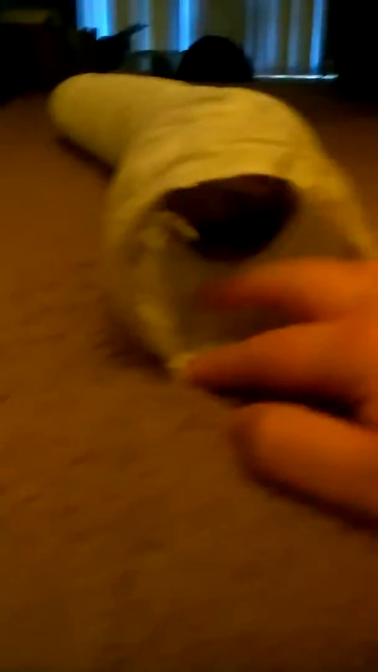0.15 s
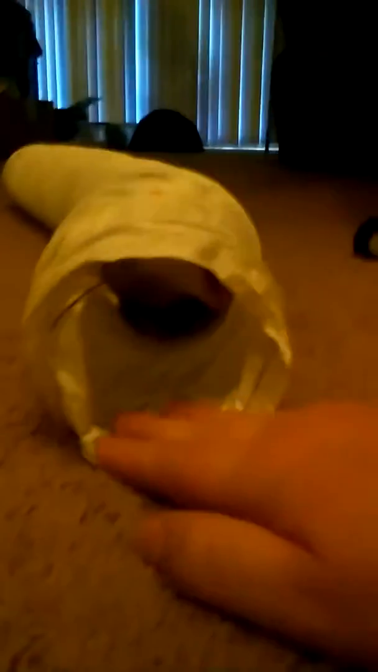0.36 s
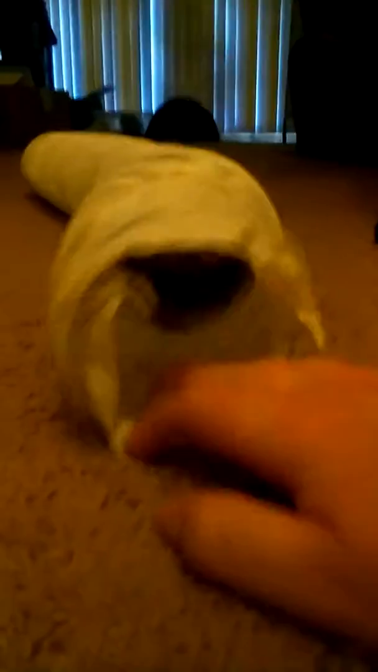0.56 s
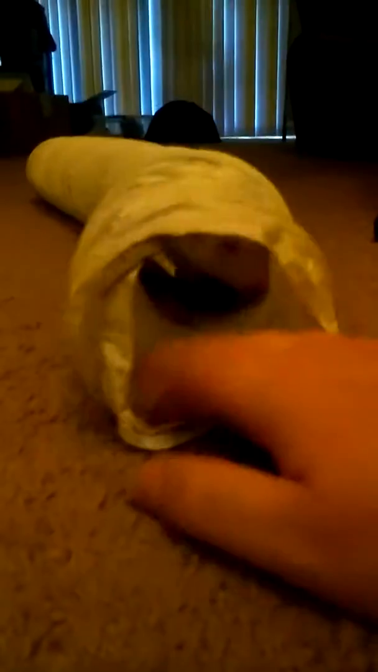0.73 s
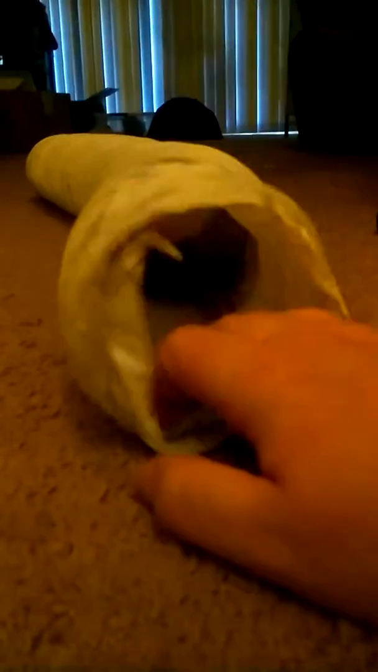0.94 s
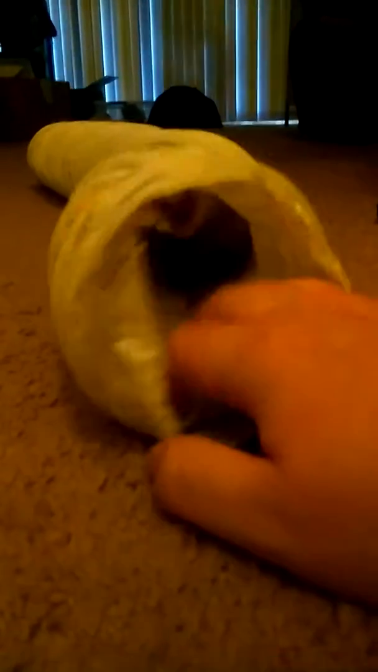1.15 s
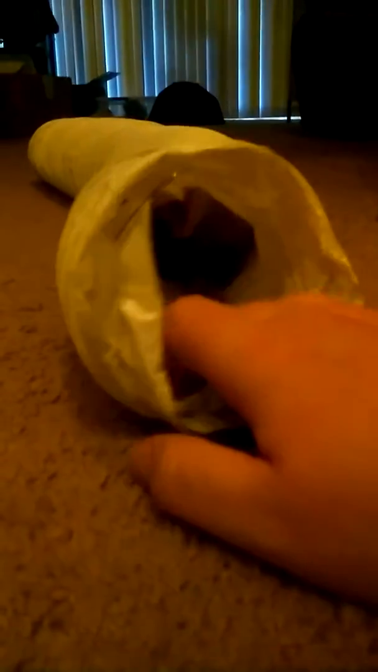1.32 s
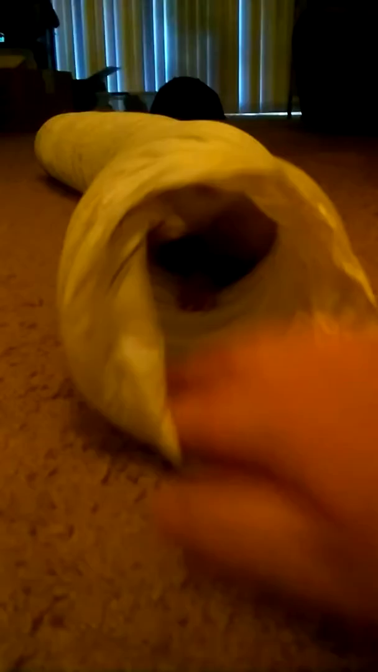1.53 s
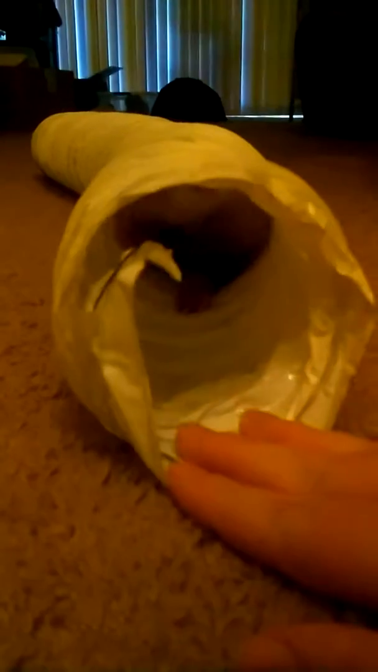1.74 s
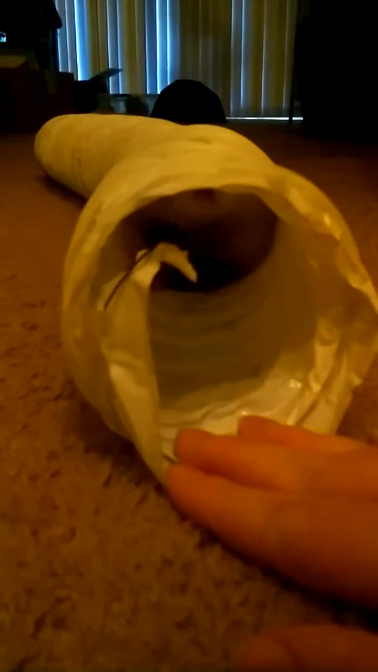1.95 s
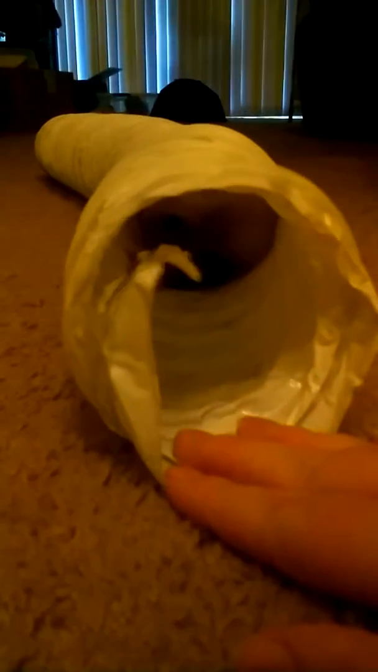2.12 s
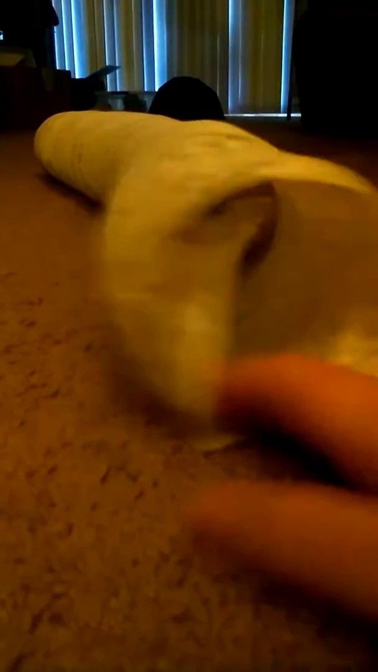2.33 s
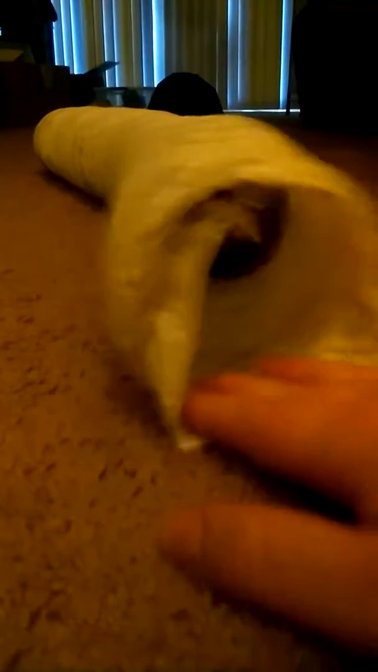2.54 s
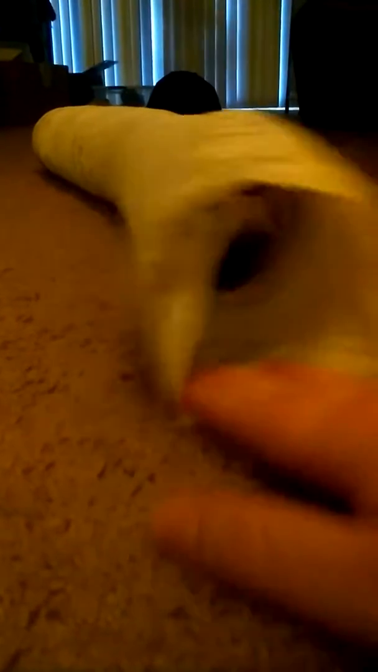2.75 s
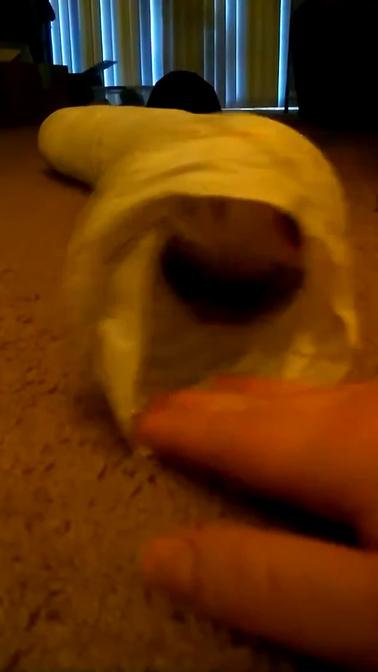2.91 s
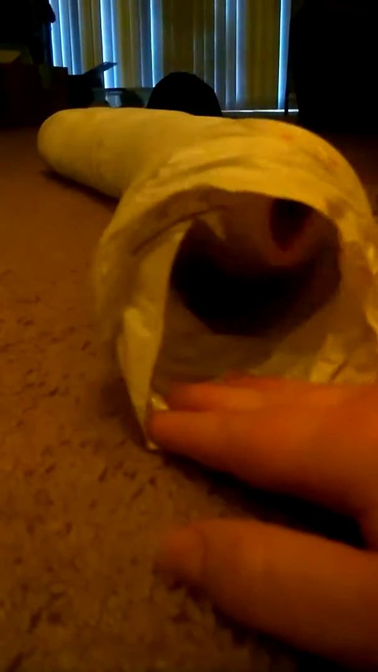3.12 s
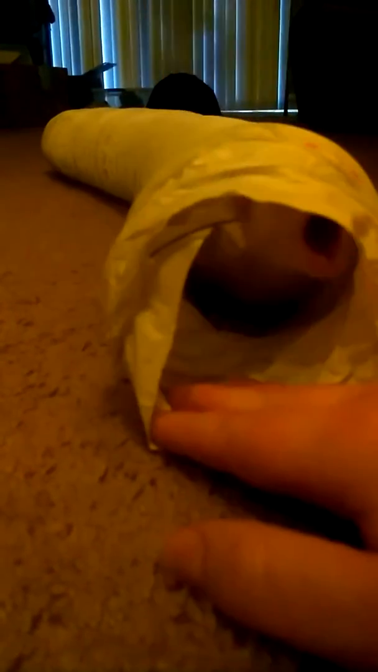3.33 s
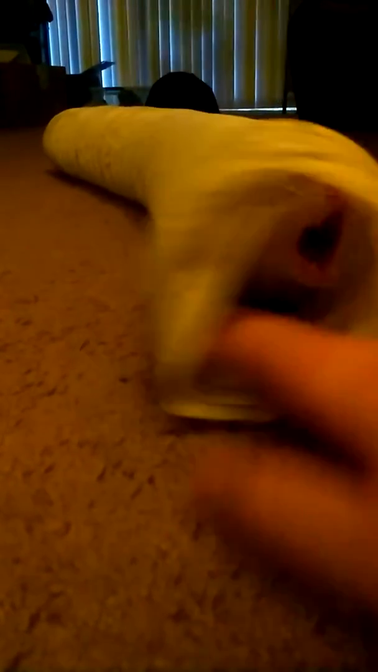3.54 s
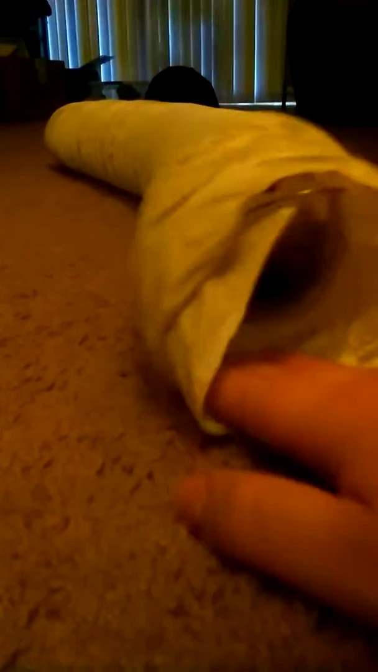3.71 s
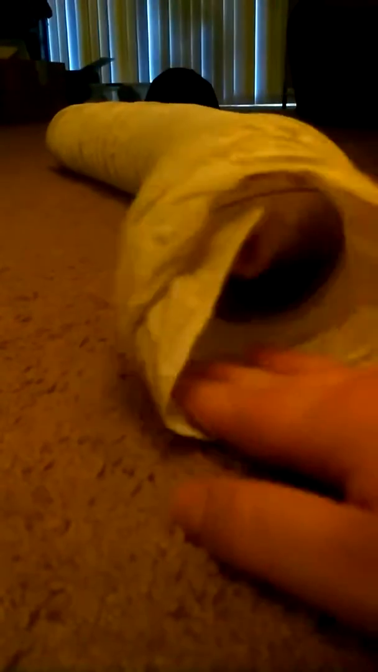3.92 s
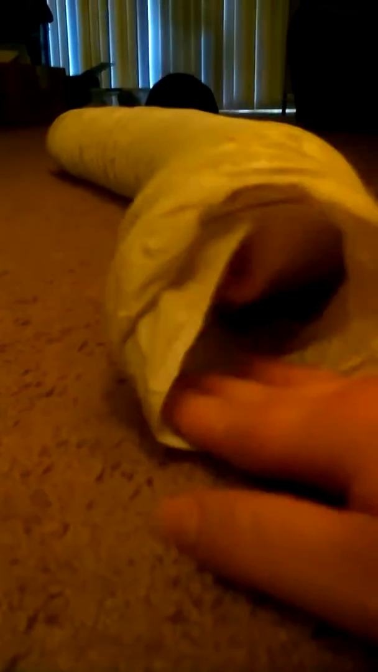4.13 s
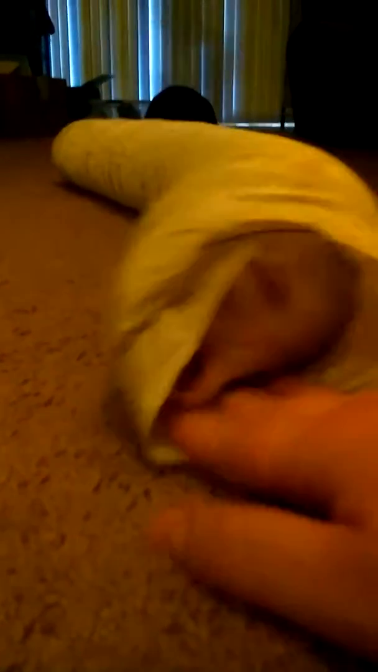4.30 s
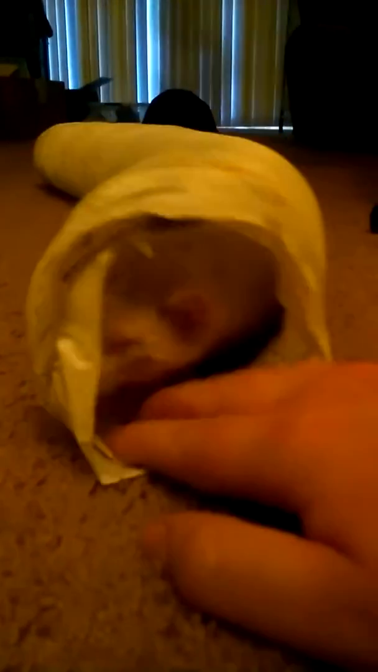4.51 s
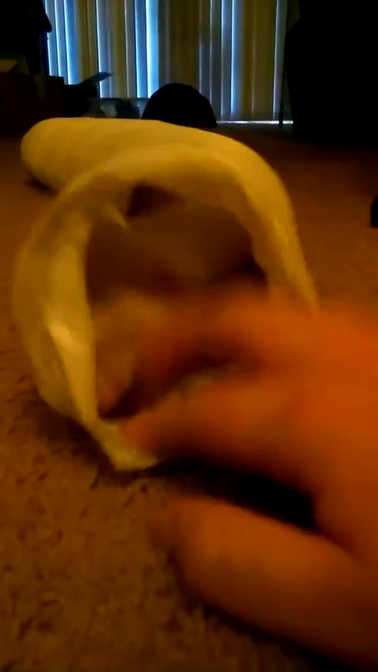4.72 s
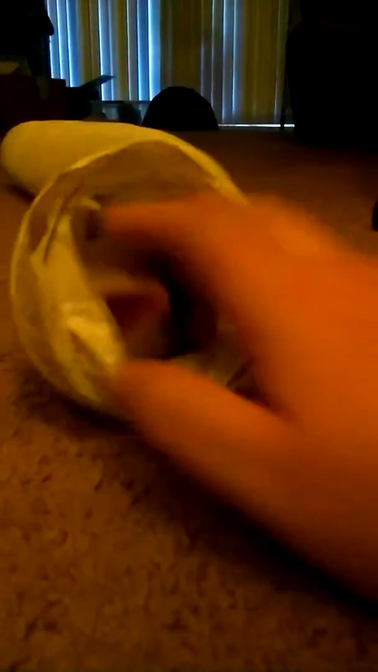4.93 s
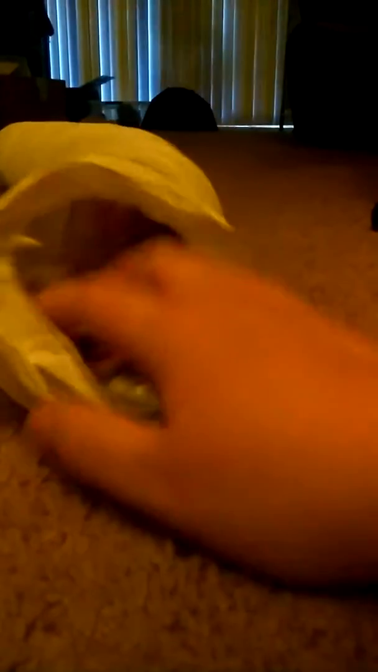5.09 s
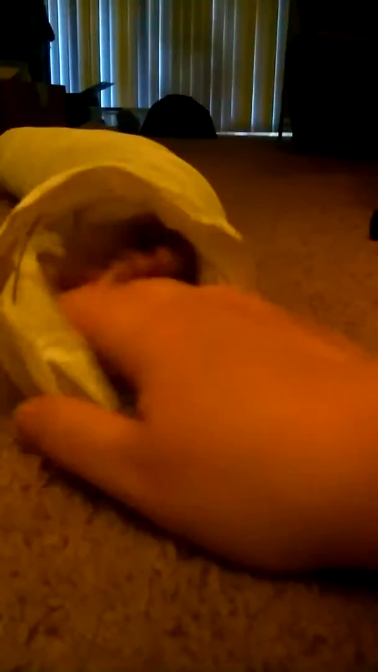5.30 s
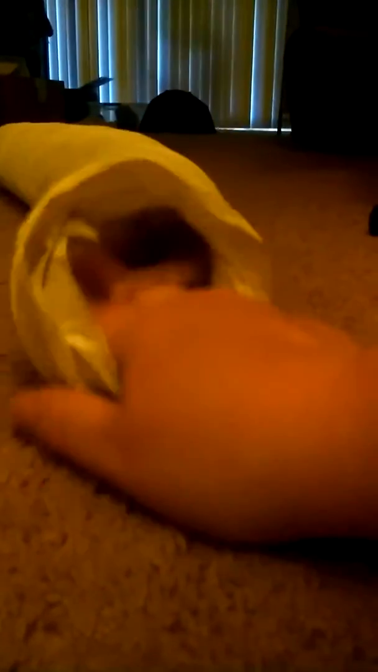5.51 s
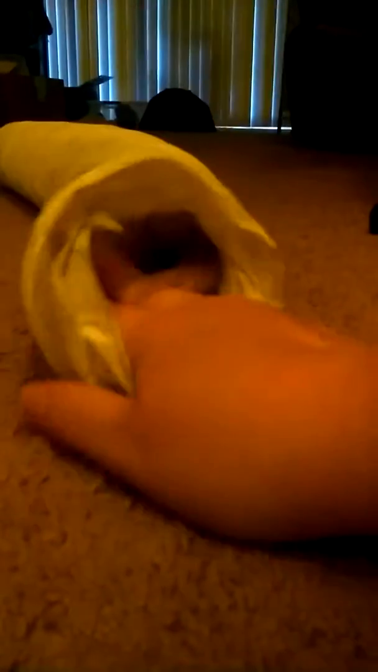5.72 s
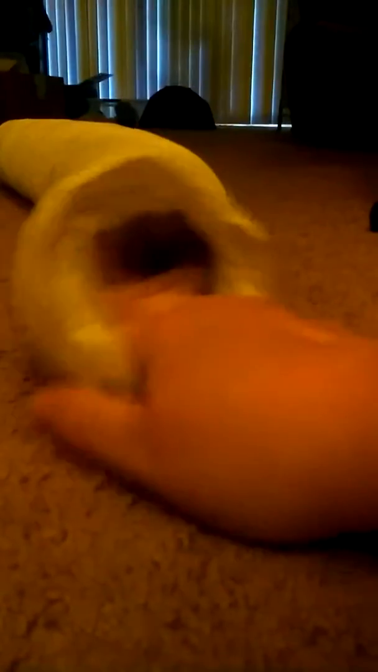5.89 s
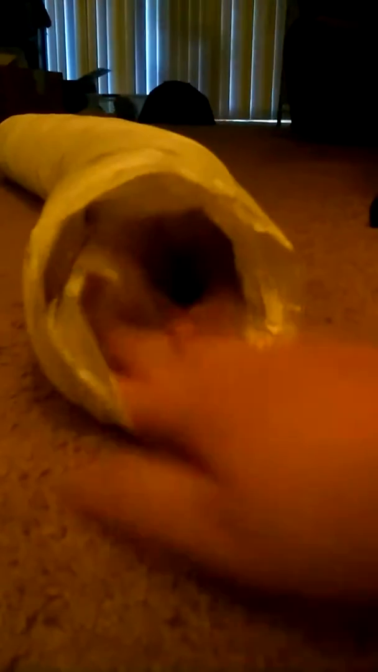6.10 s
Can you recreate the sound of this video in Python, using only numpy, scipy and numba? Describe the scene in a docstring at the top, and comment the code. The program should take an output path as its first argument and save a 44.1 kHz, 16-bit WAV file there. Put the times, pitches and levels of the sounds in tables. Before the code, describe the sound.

Thin plastic tube crinkles and rustles close up as fur and fingers rub it, with snaps, soft hollow bumps and carpet scuffs in a quiet room.

```python
"""Plastic rustles and crackles close to a phone: a ferret scrabbles along a thin tube on a carpet
while a hand plays at its mouth. Fur and fingers rub in swells of tiny slips; creases and paw knocks are
sharp pulses, softer bumps short damped tones. Filters stand for hollow, wall and film; carpet scuffs lie
below, and behind are a small room of decaying noise, air noise, hiss let through and a humming appliance."""
import sys
import numpy as np
from scipy import signal
from scipy.fft import rfft, irfft
from scipy.io import wavfile
from scipy.ndimage import uniform_filter1d
from numba import njit

SR = 44100
rng = np.random.default_rng(int(sys.argv[2]) if len(sys.argv) > 2 else 0)


def wav_record(signal):
    """Record a signal, one row per channel, as 16-bit PCM in the file named by sys.argv[1]."""
    frames = np.transpose(np.atleast_2d(signal))
    bounded = np.clip(frames, -1, 1)
    # unit amplitude maps onto the largest positive 16-bit level
    quanta = np.round(bounded * 32767).astype(np.int16)
    wavfile.write(sys.argv[1], SR, quanta)


N = 271215  # samples, about 6.15 s

# Far behind: the air of the quiet room. Each row: frequency in Hz, relative level in dB.
AIR_SPECTRUM = [(35, -7), (57, -7.5), (85, -9.5), (200, -2), (350, -10.5), (750, -18), (1560, -24),
                (2900, -23.5), (4100, -30), (5700, -20), (7500, -25), (10000, -25.5), (15500, -26.5)]
# Upper tones of the appliance hum. Each row: frequency in Hz, rms level in dB before it wavers.
UPPER_HUM = [(115.4, -80.5), (231, -72)]
# Swelling lowest tone of the hum. Each row: time in seconds, rms level in dB.
LOW_HUM_SWELL = [(0.15, -69.5), (0.93, -72.5), (1.62, -79), (3.18, -69.5), (4.03, -82.5), (4.97, -75),
                 (5.57, -84), (6.1, -69)]
# Narrow resonances of the appliance's fan. Each row: centre in Hz, width of one pass in Hz, rms level in dB.
FAN_DRONE = [(224, 36, -74.5), (796.7, 35, -72.5)]
# Narrow bands of background hiss that the phone's noise suppressor lets through after each stroke.
# Each row: centre in Hz, width of one pass in Hz, relative level in dB.
HISS_BANDS = [(2930, 560, -10), (5780, 860, 1.5)]
# Colour of the reflections. Each row: frequency in Hz, relative level in dB.
ROOM_SPECTRUM = [(100, 4.5), (500, -9), (1100, -1.5), (2500, -5), (6000, -9), (15000, 7.5)]
# The arm sliding over the carpet. Each row: time in seconds, level in dB.
SLIDE_LEVEL = [(0, -56), (0.28, -58), (0.34, -66), (2.19, -77), (2.28, -102)]
# Colour of the sleeve on the fibres. Each row: frequency in Hz, relative level in dB.
SLEEVE_SPECTRUM = [(150, -1), (400, -6), (700, 0.5), (1200, -6.5), (1800, -2.5), (2200, -12.5),
                   (2550, -8.5), (3100, -44), (4000, -53), (6800, -18), (10000, -26.5), (15500, -43)]
# The tube's weight dragging on the carpet. Each row: time in seconds, level in dB before effort and trim.
DRAG_WEIGHT = [(0, -56.5), (1.6, -60.5), (2.9, -54.5), (3.6, -63), (4.3, -59), (5, -62.5), (6.15, -63)]
# Colour of the scuffed carpet. Each row: frequency in Hz, relative level in dB.
CARPET_SPECTRUM = [(50, -31), (100, -9.5), (150, -8), (190, -4.5), (240, -1.5), (310, -1), (420, -6),
                   (700, -32)]
# Soft bumps of paws and fingers. Each row: start in seconds, level in dB before the tube's filter, pitch in Hz.
BUMP_EVENTS = [(0.594, -39, 409), (0.696, -36.5, 166), (0.994, -36.5, 227), (1.039, -35.5, 191),
               (1.122, -41, 270), (1.236, -33, 232), (1.369, -28, 228), (1.492, -36, 235),
               (1.538, -27, 221), (1.741, -41, 220), (1.857, -37.5, 234), (1.904, -34, 186),
               (1.975, -38, 213), (2.239, -36, 217), (2.261, -33, 193), (2.274, -43, 190),
               (2.416, -56, 266), (2.843, -36.5, 253), (3.074, -40, 226)]
# The open tube sheds deep bass from a bump. Each row: frequency in Hz, relative level in dB.
BUMP_SPECTRUM = [(70, -35), (120, -22), (170, -8.5), (500, -2.5), (1300, -19), (2200, -60)]
# What the tube's hollow radiates. Each row: frequency in Hz, relative level in dB.
HOLLOW_SPECTRUM = [(130, -25.5), (220, -5.5), (350, -5), (500, -2), (680, 1.5), (850, -1.5), (1050, -1.5),
                   (1280, -4), (1550, -18), (2100, -32.5)]
# What its wall radiates. Each row: frequency in Hz, relative level in dB.
WALL_SPECTRUM = [(1000, -13.5), (1600, -16.5), (2100, -3), (2700, 1.5), (3350, 0), (3900, -8.5),
                 (4300, -12.5), (4900, -14), (8000, -32.5)]
# What its loose film radiates. Each row: frequency in Hz, relative level in dB.
FILM_SPECTRUM = [(2800, -34.5), (3900, -14), (4600, -1.5), (5400, -4), (6200, -1.5), (7000, -4.5),
                 (8000, -11), (9800, -19.5), (15500, -35)]
# Creases snapping through, and dull hollow knocks of paws on the tube. Each row: start in seconds,
# hollow level in dB, wall level in dB, film level in dB before a trim, fade time of the crumpling in seconds;
# levels are rms over 2 ms.
SNAPS_AND_KNOCKS = [(0.2348, -41, -70, -69, 0.0037), (0.3063, -46, -56, -43.5, 0.0018),
                    (0.4339, -44, -46.5, -60, 0.0025), (0.4542, -39.5, -58, -63, 0.00085),
                    (0.584, -41.5, -60, -66, .003), (0.5928, -41.5, -48, -54, 0.0038),
                    (0.6519, -60, -45.5, -53, 0.0029), (0.686, -42.5, -52, -63, 0.015),
                    (0.6951, -50, -37.5, -42, 0.0016), (0.869, -51, -49, -55, 0.0033),
                    (0.8757, -46, -48, -67, 0.0025), (0.9083, -46, -44.5, -41, 0.0034),
                    (1.0212, -53, -43, -41, .001), (1.039, -52, -41, -45, 0.0023),
                    (1.054, -54, -44, -54, 0.0017), (1.108, -38, -54, -60, 0.0073),
                    (1.1218, -32, -36, -37.5, .0025), (1.127, -41, -43, -60, 0.014),
                    (1.2164, -39, -40.5, -62, 0.0016), (1.2696, -42, -36, -38, 0.0021),
                    (1.3266, -50, -53, -45.5, .003), (1.367, -35, -57, -46.5, .003),
                    (1.3913, -40, -68, -51, .008), (1.5217, -50, -48, -55, 0.0032),
                    (1.536, -32, -65, -53, 0.0035), (1.6825, -34, -55, -54, 0.0012),
                    (1.8942, -38.5, -45, -44, 0.0076), (1.9738, -38, -44, -44.5, 0.0034),
                    (1.9919, -66, -41.5, -45, 0.004), (2.288, -49, -52, -43.5, 0.0026),
                    (2.302, -40.5, -64, -40, 0.00083), (2.4153, -37.5, -42.5, -52, 0.0018),
                    (2.43, -31, -43, -36, 0.0028), (2.4355, -47, -42, -39, .0017),
                    (2.4566, -45, -41, -39, 0.0015), (2.4599, -45, -28, -27.5, 0.0017),
                    (2.8409, -37, -37, -39.5, 0.0051), (2.8536, -62, -43, -49, 0.0049),
                    (2.9263, -67, -35, -39.5, 0.0028), (3.449, -59, -62.5, -58.5, .0015),
                    (3.719, -49, -48.5, -48, 0.011), (3.7298, -41.5, -48, -62, 0.0015),
                    (3.739, -64, -42.5, -42.5, .003), (3.9127, -76, -46, -61, 0.0024),
                    (4.1471, -54, -37.5, -43, 0.0012), (4.33, -58, -53, -44.5, 0.0046),
                    (4.7753, -50.5, -45, -50, 0.0018), (4.8789, -56, -46, -43.5, 0.0039),
                    (5.0036, -41.5, -50, -49, .0025), (5.0107, -41.5, -39.5, -30, 0.0019),
                    (5.0343, -56, -36, -40.5, 0.0007), (5.142, -42.5, -47.5, -48, 0.0038),
                    (5.2828, -30, -40.5, -35.5, .0015), (5.3999, -28.5, -29, -29, 0.00079),
                    (5.404, -39.5, -46, -59, 0.0057), (5.4125, -40.5, -50, -50, 0.0028)]
# Extra colour of these pulses. Each row: frequency in Hz, relative level in dB.
PULSE_SPECTRUM = [(200, -13.5), (450, 1.5), (700, 4.5), (1200, 3.5), (1700, 3), (2500, -1.5), (3400, 0.5),
                  (4200, -2.5), (6200, 2.5), (8500, -11), (15000, -6)]
# Strokes of fur and fingers; the film rings higher where it is pulled taut. Each row: start in seconds,
# length in seconds, wall level in dB, hollow relative to the wall in dB, film relative to the wall in dB,
# film pitch in Hz; levels are before the trims of each layer.
RUB_STROKES = [(-0.02, 0.19, -73, 7.5, 2.5, 6300), (0.185, 0.12, -69.5, 16.5, -1, 5450),
               (0.274, 0.028, -51.5, 6.5, 1.5, 5870), (0.32, 0.13, -56, 7, -5, 4850),
               (0.541, 0.13, -66.5, 1.5, 3, 4600), (0.669, 0.024, -50.5, 2, -0.5, 4800),
               (0.705, 0.12, -66.5, 0, 0, 5350), (0.871, 0.12, -58.5, 3, 9, 6350),
               (0.983, 0.088, -61, 4.5, 2, 5900), (1.067, 0.11, -59, 2, 2.5, 5500),
               (1.169, 0.11, -54.0, 2.5, 2, 5500), (1.277, 0.143, -69, 10.5, 7, 5600),
               (1.416, 0.094, -59, 4.0, 5, 5600), (1.546, 0.19, -52.5, 7, -2, 5560),
               (1.639, 0.12, -48.5, 0, -4.5, 5500), (1.807, 0.102, -64, 7, 3.5, 4850),
               (1.941, 0.057, -62.0, 4.5, -3, 4550), (2.16, 0.076, -59.5, 7, -9.5, 4370),
               (2.258, 0.15, -58, 5.5, 3.5, 5700), (2.376, 0.13, -55.5, 6, 3.5, 5770),
               (2.545, 0.11, -58.5, 2.5, 4.5, 5800), (2.689, 0.06, -55.5, 4.0, 10, 5900),
               (2.803, 0.073, -52.5, 3, -0.5, 5600), (2.898, 0.09, -54, 5, 7.0, 5560),
               (2.993, 0.09, -68, 8, 7.0, 5730), (3.255, 0.03, -67.5, 7.5, -3, 5900),
               (3.561, 0.14, -63, 0.5, -1.5, 6000), (3.7, 0.082, -57, 3.5, 5, 5300),
               (3.852, 0.066, -61.5, 3, -1.5, 5930), (3.936, 0.075, -54.5, 1.5, 1.5, 6100),
               (4.044, 0.087, -56.5, 4.5, 1.5, 6100), (4.159, 0.069, -51, 1.0, 0, 5500),
               (4.26, 0.085, -62.5, 4.5, 4.5, 5300), (4.378, 0.095, -55, 3.5, 2, 5500),
               (4.451, 0.11, -61, 5.5, -0.5, 5500), (4.756, 0.13, -62, 2.5, 5, 4900),
               (4.826, 0.14, -60.0, 5.5, -3, 5640), (4.962, 0.11, -59, 2.5, 3.0, 5150),
               (5.079, 0.11, -63.5, 5.5, 0.5, 6000), (5.173, 0.25, -68.5, 8.0, 1.5, 5850),
               (5.374, 0.04, -53, 4.0, -6, 4950), (5.534, 0.083, -62.5, 0.5, -2.5, 4950),
               (5.648, 0.062, -62.0, 2, -7.5, 4570), (5.761, 0.062, -73.5, 6.5, -16.5, 4900),
               (5.879, 0.2, -63, 1, -12, 4930), (6.079, 0.086, -53.5, 3.5, -8.5, 5140)]

LOW_HUM_HZ, AIR_DB = 57.7, -67.5
ROOM_T60_S, ROOM_DELAY_S = 0.3, 0.00374
RUB_ROOM_DB, KNOCK_ROOM_DB = -9.5, -5
# the drag grows with the rubbing: dB per dB, counted from an ordinary stroke's level
DRAG_FOLLOW, USUAL_STROKE_DB = 0.59, -59.5
BUMP_T60_S = 0.051
# a stroke takes hold, slides evenly and lets go; the bent plastic then settles more slowly
ATTACK_S, RELEASE_DB_PER_S, SETTLE_DB, SETTLE_DB_PER_S = 0.043, 440, -8.5, 65.5
TOP_HZ = 15850  # upper limit of the phone's sound


def undb(db):
    """Decibels to gain."""
    return 10 ** (np.asarray(db) / 20)


def unit(x):
    """Scale to rms 1."""
    return x / np.sqrt(np.mean(x ** 2))


def curves(table):
    """The columns of a table, joined by straight lines in time."""
    s, *columns = np.transpose(table)
    return [np.interp(np.arange(N) / SR, s, c) for c in columns]


def response(points, size=2048):
    """Causal, minimum-phase impulse response of a (Hz, dB) spectrum, with unit energy."""
    hz, db = np.transpose(points)
    f = np.maximum(np.arange(size // 2 + 1) * SR / size, 1)
    octaves_outside = np.maximum(np.log2(hz[0] / f), 0) + np.maximum(np.log2(f / hz[-1]), 0)
    level_db = np.interp(np.log(f), np.log(hz), db) - 20 * octaves_outside
    # folding the cepstrum forward in time makes the response causal
    cepstrum = irfft(np.log(undb(level_db)))
    cepstrum[1:size // 2] *= 2
    cepstrum[size // 2 + 1:] = 0
    h = irfft(np.exp(rfft(cepstrum)))
    return h / np.linalg.norm(h)


def ring(x, h):
    """Pass a signal through an impulse response."""
    return signal.fftconvolve(x, h)[:len(x)]


def walk(rate):
    """Smooth random wander with a spread near 1, given new values per second."""
    k = max(int(SR / rate), 2)
    steps = np.repeat(rng.standard_normal(N // k + 2), k)
    return 1.22 * uniform_filter1d(steps, k)[:N]


def add(out, s, x):
    """Mix a short sound in at time s."""
    i = int(s * SR)
    out[i:i + len(x)] += x[:N - i]


def slips(rate, scatter_db):
    """Tiny stick-slip releases at random moments, a few stronger than the rest; rms 1."""
    size = undb(scatter_db * np.minimum(rng.exponential(size=N), 4))
    released = rng.random(N) < rate / SR
    return unit(released * size * rng.choice([-1, 1], N))


def lingering(db, fade_db_per_s):
    """A level that rises at once and falls no faster than the given slope."""
    ramp = fade_db_per_s * np.arange(N) / SR
    return np.maximum.accumulate(db + ramp) - ramp


@njit
def resonate(x, hz, width):
    """State-variable band-pass whose centre may move; gain 1 at the centre."""
    y, band, low = np.empty(len(x)), 0., 0.
    for i in range(len(x)):
        g, k = np.tan(np.pi * hz[i] / SR), width / hz[i]
        v = (band + g * (x[i] - low)) / (1 + g * (g + k))
        band, low, y[i] = 2 * v - band, low + 2 * g * v, k * v
    return y


def narrow_noise(hz, width):
    """Noise ringing in one steep resonance, rms 1."""
    centre = np.full(N, float(hz))
    once = resonate(rng.standard_normal(N), centre, float(width))
    return unit(resonate(once, centre, float(width)))


def background(waver_db=3.8, drift_rad=0.2):
    """Steady air noise, the drone of a fan and the slightly wavering hum of its motor."""
    t = np.arange(N) / SR
    swell_db, = curves(LOW_HUM_SWELL)
    hum = undb(swell_db) * np.sin(2 * np.pi * LOW_HUM_HZ * t + drift_rad * walk(4.2))
    for hz, db in UPPER_HUM:
        level = undb(db + waver_db * walk(3.02))
        hum += level * np.sin(2 * np.pi * hz * t + drift_rad * walk(7))
    drone = sum(undb(db) * narrow_noise(hz, width) for hz, width, db in FAN_DRONE)
    air = undb(AIR_DB) * ring(rng.standard_normal(N), response(AIR_SPECTRUM))
    return np.sqrt(2) * hum + drone + air  # root 2 turns rms into peak


def released_hiss(effort_db, film_rel, hiss_db=-17, fade_db_per_s=52):
    """Narrow bands of background hiss that the phone's suppressor lets through, fading slowly after strokes."""
    hiss = sum(undb(db) * narrow_noise(hz, width) for hz, width, db in HISS_BANDS)
    return hiss * undb(hiss_db + lingering(effort_db + film_rel, fade_db_per_s))


def room(x, size=16384):
    """Short reflections from the tube's length and the furnished room: delayed, decaying noise."""
    t = np.arange(size) / SR
    decay = np.exp(-np.log(1000) * t / ROOM_T60_S) * (t > ROOM_DELAY_S)
    tail = ring(rng.standard_normal(size), response(ROOM_SPECTRUM)) * decay
    return ring(x, tail / np.linalg.norm(tail))


def sliding():
    """The arm brushes over the carpet fibres in a dense run of slips."""
    level_db, = curves(SLIDE_LEVEL)
    return ring(slips(5000, 1.4) * undb(level_db), response(SLEEVE_SPECTRUM))


def dragging(effort_db, drag_db=-5.5, grab_db=2.5):
    """Each stroke shifts the tube on the carpet pile with a low, uneven scuff."""
    weight_db, = curves(DRAG_WEIGHT)
    level_db = weight_db + DRAG_FOLLOW * (effort_db - USUAL_STROKE_DB)
    scuff = slips(450, 2.7) * undb(level_db + drag_db + grab_db * walk(25))
    return ring(scuff, response(CARPET_SPECTRUM))


def bumps(overtone_ratio=2.7, overtone_db=-11, size=8192):
    """A padded blow sets the tube and its air swinging for a few cycles; the carpet damps them."""
    out, t = np.zeros(N), np.arange(size) / SR
    fade = np.exp(-np.log(1000) * t / BUMP_T60_S)
    for s, db, hz in BUMP_EVENTS:
        phase = 2 * np.pi * hz * t
        overtone = undb(overtone_db) * fade ** 2 * np.sin(overtone_ratio * phase)
        add(out, s, undb(db) * (fade * np.sin(phase) + overtone))
    h = response(BUMP_SPECTRUM)
    return ring(out, h / np.abs(rfft(h)).max())


def snaps_and_knocks(crumple=0.62, film_trim_db=.5, rebound=0.28, size=2048):
    """A crease or a paw's knock gives one sharp pulse and a rebound, among fading random crumpling."""
    out, t = np.zeros(N), np.arange(size) / SR
    spectra = (HOLLOW_SPECTRUM, WALL_SPECTRUM, FILM_SPECTRUM)
    parts = [ring(response(PULSE_SPECTRUM), response(points)) for points in spectra]
    span = np.sqrt(.002 * SR)  # levels are rms over 2 ms
    for s, *levels, fade_s in SNAPS_AND_KNOCKS:
        push = crumple * rng.standard_normal(size) * np.exp(-t / max(fade_s, 1 / SR))
        push[0] += 2
        push[int(np.clip(fade_s * SR / 2, 1, size - 1))] -= 2 * rebound
        for h, db, trim_db in zip(parts, levels, (0, 0, film_trim_db)):
            sound = ring(push, h)
            add(out, s, sound * span * undb(db + trim_db) / np.linalg.norm(sound))
    return out


def strokes():
    """Wall level, hollow and film relative to it (dB), film pitch; powers of overlapping strokes add up."""
    t = np.arange(0, N, 32) / SR
    power, pitch = np.full((3, len(t)), 1e-18), np.zeros(len(t))
    for start, length, db, hollow_rel, film_rel, hz in RUB_STROKES:
        since_end = np.maximum(t - start - length, 0)
        grip = np.clip((t - start) / ATTACK_S, 0, 1)
        release = undb(-RELEASE_DB_PER_S * since_end)
        settling = undb(SETTLE_DB - SETTLE_DB_PER_S * since_end)
        levels = undb([db, db + hollow_rel, db + film_rel])
        parts = np.outer(levels, grip * np.hypot(release, settling)) ** 2
        power = power + parts
        pitch = pitch + hz * parts[2]  # weighted by the film's power
    wall, hollow, film = 10 * np.log10(power)
    taut_hz = np.maximum(pitch / power[2], 1)
    return curves(np.column_stack([t, wall, hollow - wall, film - wall, taut_hz]))


def crinkles(effort_db, film_rel, count=420, size=1024, crinkle_db=2.0, scatter_db=3, cycles=2.7,
             low_hz=2200, high_hz=6800):
    """Small wrinkles flick over during the rubbing, each ringing briefly at its own pitch."""
    out, t = np.zeros(N), np.arange(size) / SR
    for when, pitch, strength in rng.random((count, 3)):
        i, hz = int(when * N), low_hz + (high_hz - low_hz) * pitch
        scatter = scatter_db * min(-np.log(1 - strength), 3)
        db = effort_db[i] + pitch * film_rel[i] + crinkle_db + scatter  # higher ones follow the film more
        age = 2 * hz * t / cycles
        add(out, i / SR, undb(db) * age * np.exp(1 - age) * np.sin(2 * np.pi * hz * t))
    return out


def rubbing(effort_db, hollow_rel, film_rel, taut_hz, slips_per_s=3400, scatter_db=1.36, judder_db=0.78,
            flutter_db=1.91, hollow_db=-1, wall_db=-1, film_db=-.5, taut_width_hz=1100, taut_db=3):
    """Fur and skin slide over the plastic; the same slips shake hollow, wall and film."""
    friction = slips(slips_per_s, scatter_db) * undb(judder_db * walk(110))
    hollow = ring(friction, response(HOLLOW_SPECTRUM))
    wall = ring(friction, response(WALL_SPECTRUM))
    film = ring(friction, response(FILM_SPECTRUM))
    film = film + undb(taut_db) * resonate(film, taut_hz, float(taut_width_hz))
    parts = ((hollow, hollow_db + hollow_rel), (wall, wall_db), (film, film_db + film_rel))
    # the contact wanders, so each part's share flutters
    return sum(unit(x) * undb(effort_db + db + flutter_db * walk(45)) for x, db in parts)


def scene():
    """The tube close by, its reflections and the quiet room."""
    effort_db, hollow_rel, film_rel, taut_hz = strokes()
    rustle = released_hiss(effort_db, film_rel) + sliding() + dragging(effort_db)
    rustle += crinkles(effort_db, film_rel)
    rustle += rubbing(effort_db, hollow_rel, film_rel, taut_hz)
    knocks = bumps() + snaps_and_knocks()
    reflections = room(undb(RUB_ROOM_DB) * rustle + undb(KNOCK_ROOM_DB) * knocks)
    return (background() + reflections + rustle + knocks)[None]


def suppress(x, open_db=-55, slope=0.52, fade_db_per_s=170, split_hz=6500):
    """A noise suppressor turns the hiss above the split down while little else is sounding."""
    activity = signal.sosfilt(signal.butter(2, 500, "high", fs=SR, output="sos"), x)
    level_db = 10 * np.log10(np.abs(uniform_filter1d(activity ** 2, size=700)) + 1e-18)
    gain_db = slope * np.minimum(lingering(level_db, fade_db_per_s) - open_db, 0)
    low = signal.sosfiltfilt(signal.butter(3, split_hz, fs=SR, output="sos"), x)
    return low + (x - low) * undb(gain_db)


def record(dry):
    """The phone ducks the hiss in the pauses and cuts the deepest bass and the top."""
    thin = signal.sosfilt(signal.butter(4, 40, "high", fs=SR, output="sos"), suppress(dry[0]))
    return signal.sosfilt(signal.ellip(10, .2, 70, TOP_HZ, fs=SR, output="sos"), thin)[None]


dry = scene()
out = record(dry)
wav_record(out)
```